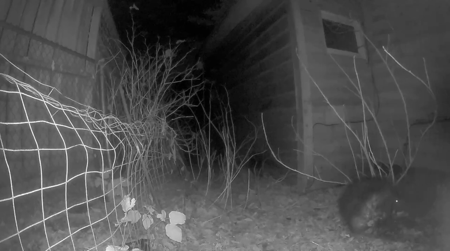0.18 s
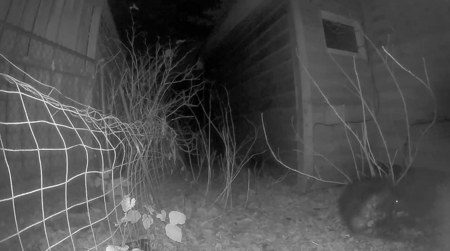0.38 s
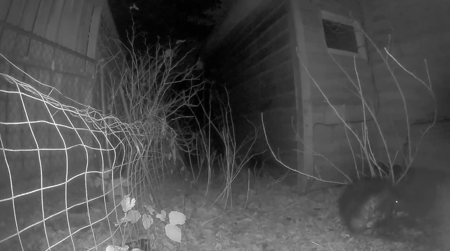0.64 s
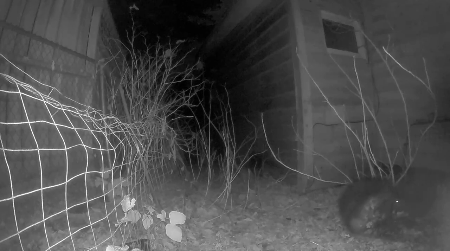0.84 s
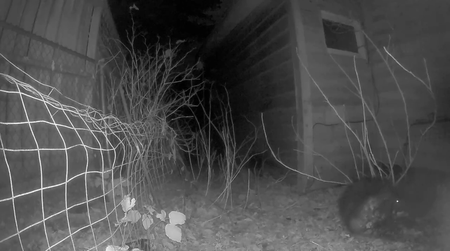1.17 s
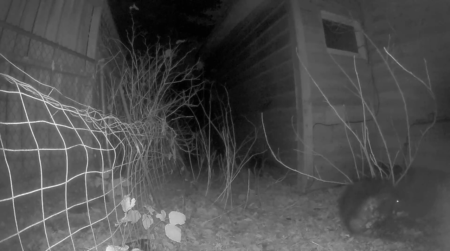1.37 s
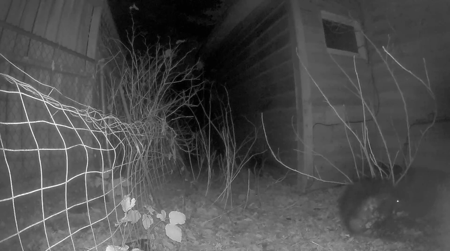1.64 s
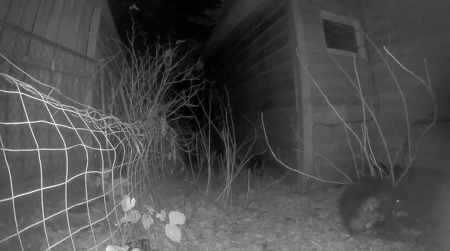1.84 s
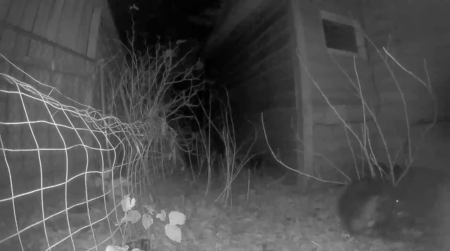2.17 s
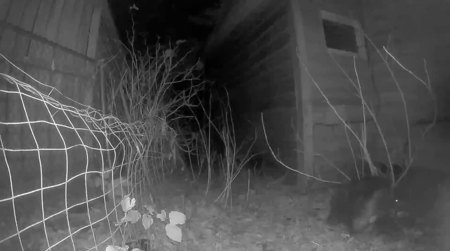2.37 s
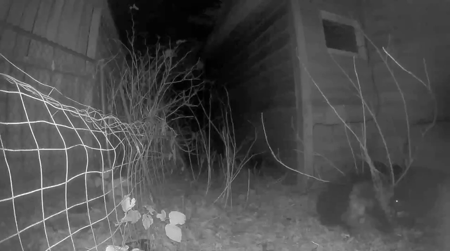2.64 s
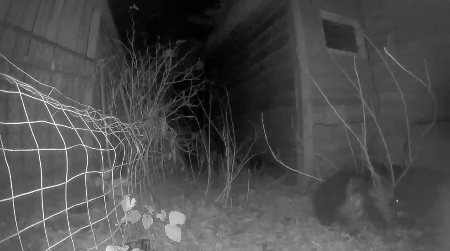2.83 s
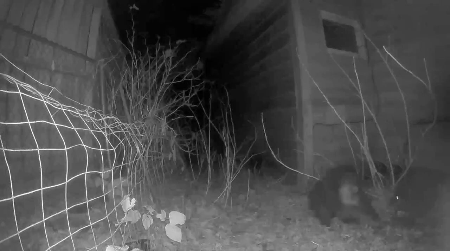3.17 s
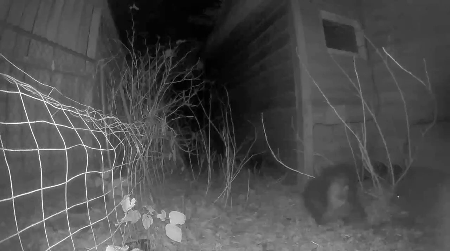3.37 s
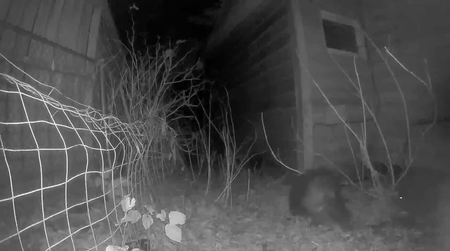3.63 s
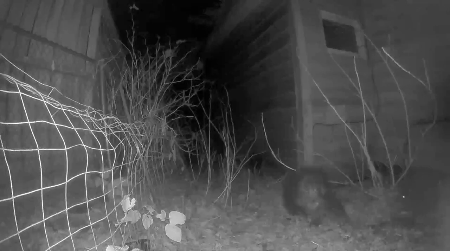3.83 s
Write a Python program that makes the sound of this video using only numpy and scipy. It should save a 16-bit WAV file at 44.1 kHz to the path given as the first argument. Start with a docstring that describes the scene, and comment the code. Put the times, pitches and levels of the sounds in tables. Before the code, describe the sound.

A porcupine whines and moans softly, then squeals loudly outdoors at night amid constant hiss

```python
"""Three nasal, quarrelling porcupine cries by a wooden shed at night, over the steady hiss of a small trail camera.
Each cry opens with a high squeak and slides down into a long moan; the third starts as a loud, rasping squeal.
Jittering vocal pulses and puffs of air ring a throat filter, in bands with their own level curves.
Wall echoes and a short noise tail follow; a filtered click makes a knock, narrow noise bursts make dry ticks."""
import sys
import numpy as np
from scipy import signal
from scipy.fft import rfft, irfft, next_fast_len
from scipy.io import wavfile
from scipy.ndimage import uniform_filter1d

SR = 44100
rng = np.random.default_rng(int(sys.argv[2]) if len(sys.argv) > 2 else 0)


def wav_out(sig):
    """Save sig, one row per channel (or a flat mono array), as 16-bit PCM at SR to the path in sys.argv[1]."""
    wavfile.write(sys.argv[1], SR, np.round(np.clip(np.atleast_2d(sig).T, -1, 1) * 32767).astype(np.int16))


N = 176400
TIME_S = np.arange(N) / SR

# Hiss spectrum. Each row: frequency [Hz], relative density [dB per Hz].
HISS_SPECTRUM = [(15, -42), (25, -12), (166, -8.5), (212, -12.5), (264, -6), (421, -9), (454, -9.5),
                 (760, -8.5), (1340, -10.5), (2030, -6.5), (2290, -8.5), (2470, -9.5), (4240, -11.5),
                 (7460, -16.5), (8860, -36.5), (11500, -65), (19500, -120)]
HISS_DB, CUTOFF_HZ = -65, 8900  # rms before the camera's filter; upper limit of voice, hiss and camera

# Dry ticks. Each row: start [s], burst level before halving [dB], pitch [Hz], t60 [s].
TICKS = [(1.203, -53, 7400, 0.016), (2.474, -53, 6200, 0.026), (3.709, -49, 5630, 0.0019)]
KNOCK_S, KNOCK_IMPULSE_DB, KNOCK_DULL_HZ = 3.229, -9.5, 5000

# Echoes off the walls. Each row: delay [s], gain [dB].
ECHOES = [(.0125, -19), (.021, -18), (.034, -22)]
YARD_DB, YARD_T60_S, YARD_DULL_HZ = -13, 0.58, 6000  # tail energy before dulling
SCATTER_DB, SCATTER_T60_S = -6.5, 0.028  # litter and boards right next to the animals

# Throat resonances, mouth nearly shut and wide open. Each row: frequency [Hz], gain [dB].
SHUT_THROAT = [(300, 8), (450, 1), (680, -2), (850, -6), (1050, 0), (1300, 2), (1550, -18.5), (1850, -10),
               (2150, -7), (2500, -17), (3050, -7), (3600, -19.5), (4300, -10), (4800, -14), (5600, 6.5),
               (6300, -33.5), (7300, -34), (9000, -48.5)]
OPEN_THROAT = [(400, -9.5), (700, -11.5), (1050, 1), (1370, 7.5), (1850, -12.5), (2200, -9), (2500, -5.5),
               (3050, 1.5), (3600, -4), (4100, -6.5), (4650, -1), (5100, -10), (5500, -19.5), (6200, -19.5),
               (7150, -3), (8000, -23.5), (9000, -44)]
# Turbulence at the teeth. Each row: frequency [Hz], gain [dB].
AIR_SPECTRUM = [(800, -20), (1300, -10), (1900, -8.5), (3000, -2), (4400, -2.5), (5700, -9.5),
                (6400, -11.5), (7500, -15.5), (9000, -38)]

# Base pitch of each cry. Each row: time [s], frequency [Hz].
WHINE_PITCH = [(.03, 421.4), (.06, 539), (.078, 419.2), (.094, 287.6), (.12, 227.2), (.182, 245.4),
               (.218, 244.4), (.276, 229.9), (.45, 222.4), (.666, 218.9), (.764, 179.8), (.836, 165.3),
               (.896, 176), (.99, 161.3)]
MOAN_PITCH = [(1.745, 720.5), (1.771, 697.7), (1.787, 558.5), (1.801, 357.7), (1.821, 247.6),
              (1.841, 213.2), (1.913, 263), (2.017, 259.1), (2.069, 251.7), (2.185, 256.3), (2.299, 233.1),
              (2.473, 218.7), (2.501, 201), (2.53, 178.4)]
SQUEAL_PITCH = [(3.112, 670), (3.126, 763.3), (3.14, 791.3), (3.16, 772.7), (3.188, 698.7), (3.202, 662.4),
                (3.258, 420), (3.29, 345.7), (3.346, 336.7), (3.38, 291.1), (3.43, 290.6), (3.456, 275.6),
                (3.542, 214.7), (3.634, 216.3), (3.698, 226.7), (3.75, 215.4), (3.79, 175.6)]
# Rasp of each cry. Each row: time [s], roughness [0-1].
WHINE_RASP = [(.06, 0.2), (.085, 0.83), (.16, 0.11), (.6, .1), (.9, 0.33)]
MOAN_RASP = [(1.77, 0.094), (1.796, 0.28), (1.85, 0.2), (1.92, 0.048), (2.501, 0.16)]
SQUEAL_RASP = [(3.145, .02), (3.17, .14), (3.195, .19), (3.235, .33), (3.275, .26), (3.31, .09),
               (3.47, .07), (3.58, .45)]
# Mouth of each cry. Each row: time [s], opening [0-1].
WHINE_MOUTH = [(.07, 0.1), (.2, 0.13), (.35, 0)]
MOAN_MOUTH = [(1.79, 0.29), (1.86, 0.075), (2.04, 0.23), (2.3, 0.089)]
SQUEAL_MOUTH = [(3.34, 0.58), (3.42, 0.55), (3.56, 0.54)]
# Fundamental of each cry. Each row: time [s], level before trim [dB].
WHINE_HUM = [(.03, -77), (.065, -57), (.102, -61.5), (.136, -74), (.19, -59.5), (.286, -66.5), (.36, -60.5),
             (.53, -83), (.752, -59.5), (.828, -64.5), (.94, -67.5), (.99, -73)]
MOAN_HUM = [(1.745, -63), (1.825, -60.5), (1.853, -86), (1.885, -58.5), (1.913, -52), (2.013, -52),
            (2.061, -56.5), (2.249, -56.5), (2.407, -65), (2.447, -76), (2.507, -63), (2.53, -64.5)]
SQUEAL_HUM = [(3.112, -60), (3.126, -54), (3.152, -58.5), (3.176, -43), (3.248, -56), (3.258, -48),
              (3.364, -54), (3.382, -46.5), (3.47, -45.5), (3.52, -60), (3.532, -65), (3.566, -58),
              (3.7, -66), (3.766, -55.5), (3.79, -86)]
# Low overtones against the nasal middle, one curve a cry. Each row: time [s], gain [dB].
LOW_GAINS = [
    [(.1, 1.5), (.22, -1), (.45, 5), (.66, 5), (.73, 6.5)],
    [(1.8, -2.5), (1.95, 3), (2.45, -0.5)],
    [(3.25, 4), (3.42, 1.5), (3.5, -10), (3.6, -2), (3.75, 8)],
]
# Nasal middle, treble and airy top, one curve a cry. Each row: time [s], level before trim [dB].
MIDDLE_LEVELS = [
    [(0.03, -80), (0.064, -57.5), (0.146, -64.5), (0.17, -56), (0.242, -54), (0.272, -59), (0.366, -63),
     (0.448, -60.5), (0.674, -67), (0.682, -71.5), (0.8, -84), (0.804, -87), (0.946, -80), (0.98, -93),
     (0.99, -81)],
    [(1.745, -76), (1.771, -61), (1.785, -47.5), (1.841, -57.5), (1.893, -54), (1.953, -60), (1.979, -57),
     (2.049, -67.5), (2.089, -58), (2.193, -67.5), (2.239, -61.5), (2.345, -64), (2.359, -62), (2.507, -67),
     (2.53, -84)],
    [(3.112, -69.5), (3.12, -44.5), (3.144, -47.5), (3.194, -31), (3.218, -34), (3.246, -37.5),
     (3.268, -38), (3.316, -46), (3.332, -38.5), (3.364, -53), (3.432, -50.5), (3.502, -42.5), (3.532, -55),
     (3.752, -64.5), (3.79, -91)],
]
TREBLE_LEVELS = [
    [(0.03, -73), (0.042, -92.5), (0.07, -59), (0.136, -76), (0.186, -61), (0.31, -65.5), (0.502, -64.5),
     (0.754, -70.5), (0.772, -82), (0.824, -68), (0.956, -90), (0.962, -76), (0.99, -86)],
    [(1.745, -61), (1.749, -61.5), (1.789, -45.5), (1.829, -64.5), (1.867, -67.5), (1.891, -56.5),
     (1.923, -59.5), (2.051, -55.5), (2.069, -60), (2.313, -68), (2.329, -62.5), (2.523, -67.5),
     (2.53, -78)],
    [(3.112, -65), (3.122, -38), (3.138, -29.5), (3.17, -22.5), (3.304, -35), (3.342, -36), (3.36, -47),
     (3.452, -46), (3.502, -66.5), (3.636, -57.5), (3.79, -65.5)],
]
TOP_LEVELS = [
    [(0.03, -96), (0.102, -67.5), (0.59, -67.5), (0.606, -77), (0.768, -67.5), (0.932, -92), (0.946, -78),
     (0.964, -88), (0.99, -83)],
    [(1.745, -75), (1.781, -63.5), (1.853, -74.5), (1.959, -63.5), (2.459, -74), (2.475, -65), (2.485, -86),
     (2.515, -74), (2.53, -94)],
    [(3.112, -75), (3.128, -48.5), (3.154, -39), (3.174, -37.5), (3.326, -57.5), (3.456, -58), (3.482, -61),
     (3.634, -59), (3.79, -67.5)],
]
# Nasal and bright resonances, moved by tongue and jaw, one curve a cry. Each row: time [s], centre [Hz].
NASAL_CENTRES = [
    [(.06, 1040), (.22, 1130), (.32, 930), (.42, 1390), (.55, 1230), (.66, 1090)],
    [(1.8, 1160), (1.98, 1010), (2.12, 1320), (2.26, 970), (2.4, 1198)],
    [(3.2, 1240), (3.33, 1426), (3.41, 1260), (3.47, 1360), (3.52, 1206), (3.57, 1600), (3.72, 1302)],
]
BRIGHT_CENTRES = [
    [(.08, 3040), (.22, 2770), (.45, 3500), (.55, 4186)],
    [(1.79, 2950), (1.97, 3520), (2.04, 3100), (2.3, 3200)],
    [(3.14, 5140), (3.18, 3720), (3.25, 3300), (3.29, 4170), (3.34, 4100), (3.38, 3930), (3.41, 2930),
     (3.46, 3170)],
]
# Trims in dB, one row a cry. Each row: fundamental, middle, treble, top.
TRIMS_DB = [(-0.81, -0.78, -0.63, -1.9), (-0.22, -1.4, -0.35, -0.44), (-1.4, -0.51, -0.7, 0.59)]

LOW_EDGE_HZ, MIDDLE_EDGE_HZ, TREBLE_EDGE_HZ = 850, 1850, 5000  # upper edges of the bands
ATTACK_S, RELEASE_S = .006, .015
JITTER_RATIO, JITTER_HZ, SHIMMER_DB = 0.0333, 166, 9  # spread at full roughness; jitter as a share of pitch
WAVER_RATIO, WAVER_HZ = 0.00369, 20.9  # share of pitch, whatever the roughness
OPEN_AIR, SHUT_AIR = .5, 2.2  # gain of the turbulence, mouth open and shut
MIDDLE_AIR, TOP_AIR = .3, 7.5  # gain in the middle; top gain relative to the treble
NASAL_DB, NASAL_WIDTH_HZ, BRIGHT_DB, BRIGHT_WIDTH_HZ = 7, 180, 3.5, 180  # half-widths at half the lift
PULSE_SPREAD_RAD = .12  # soft closure of the folds: lag per squared order


def from_db(db):
    """Decibels to gain."""
    return 10 ** (np.asarray(db) / 20)


def rms_one(x):
    """Scale to unit power."""
    return x / np.sqrt(np.mean(x ** 2) + 1e-20)


def strength(x, size=600):
    """Short-term rms, window in samples, smoothed twice."""
    power = uniform_filter1d(uniform_filter1d(x * x, size), size)
    return np.sqrt(np.abs(power) + 1e-12)


def even(x):
    """Hold the short-term power near one."""
    return x / strength(x)


def in_time(rows, t):
    """Linear curve through the rows, at the times t."""
    s, value = np.transpose(rows)
    return np.interp(t, np.sort(s), value)


def butter(x, hz, kind, order=2):
    """Butterworth filter."""
    return signal.sosfilt(signal.butter(order, hz, kind, fs=SR, output="sos"), x)


def drift(hz, size):
    """Low-passed noise: random wandering up to a given rate, rms 1."""
    return rms_one(butter(rng.standard_normal(size + SR // 2), hz, "low")[-size:])


def colour(x, points):
    """Causal minimum-phase filter with the given spectrum, by folding the cepstrum."""
    size = 2 * next_fast_len(len(x) // 2 + SR // 10)
    hz, db = np.transpose(points)
    bins_hz = np.maximum(np.arange(size // 2 + 1) * SR / size, 1)
    gain_db = np.interp(np.log(bins_hz), np.log(hz), db)
    cepstrum = irfft(np.log(from_db(gain_db)))
    cepstrum[1:size // 2] *= 2
    cepstrum[size // 2 + 1:] = 0
    response = np.exp(rfft(cepstrum))
    return irfft(rfft(x, size) * response)[:len(x)]


def camera_hiss():
    """Steady coloured noise, low-passed."""
    noise = colour(rng.standard_normal(N), HISS_SPECTRUM)
    return from_db(HISS_DB) * rms_one(butter(noise, CUTOFF_HZ, "low", order=8))


def yard(x):
    """Discrete wall echoes and a short diffuse tail of decaying noise."""
    t = TIME_S[:SR]
    build_up = np.clip(t / ECHOES[0][0], 0, 1)
    tail = rng.standard_normal(SR) * from_db(-60 * t / YARD_T60_S) * build_up
    tail = butter(tail, YARD_DULL_HZ, "low") / np.sqrt(np.sum(tail ** 2))
    echoes = sum(from_db(db) * np.interp(TIME_S - delay_s, TIME_S, x) for delay_s, db in ECHOES)
    return echoes + from_db(YARD_DB) * signal.fftconvolve(x, tail)[:N]


def scatter(x):
    """Nearby surfaces blur the treble of each pulse over a few milliseconds."""
    t = TIME_S[:SR // 10]
    blur = rng.standard_normal(len(t)) * from_db(-60 * t / SCATTER_T60_S)
    blur = blur / np.sqrt(np.sum(blur ** 2))
    treble = butter(x, MIDDLE_EDGE_HZ, "high")
    return x + from_db(SCATTER_DB) * signal.fftconvolve(treble, blur)[:N]


def ticks(width=0.015):
    """Narrow bright noise bursts that start at once and decay exponentially."""
    out = np.zeros(N)
    for start_s, db, hz, t60_s in TICKS:
        band_hz = [hz * (1 - width), hz * (1 + width)]
        burst = rms_one(butter(rng.standard_normal(N), band_hz, "band", order=1))
        decay_db = -60 * np.clip((TIME_S - start_s) / t60_s, 0, 2)
        out += .5 * burst * (TIME_S >= start_s) * from_db(db + decay_db)
    return out


def knock():
    """A sharp knock at the height of the squeal: one impulse through a gentle low-pass."""
    click = np.zeros(N) + 1e-18
    click[int(KNOCK_S * SR)] = from_db(KNOCK_IMPULSE_DB)
    return butter(click, KNOCK_DULL_HZ, "low", order=1)


def resonance_db(hz, centre_hz, peak_db, width_hz):
    """Bell-shaped lift around a resonance."""
    return peak_db / (1 + ((hz - centre_hz) / width_hz) ** 2)


def vocal_pulses(hz, phase, nasal_hz, bright_hz):
    """Overtones of the vocal folds, lifted where they meet the two moving resonances."""
    out = 0
    for k in range(2, int(CUTOFF_HZ / hz.min())):
        lift_db = resonance_db(k * hz, nasal_hz, NASAL_DB, NASAL_WIDTH_HZ)
        lift_db = lift_db + resonance_db(k * hz, bright_hz, BRIGHT_DB, BRIGHT_WIDTH_HZ)
        below_cutoff = np.clip(CUTOFF_HZ / hz - k + 1, 0, 1)
        out = out + np.cos(k * phase - PULSE_SPREAD_RAD * k * k) * from_db(lift_db) * below_cutoff
    return even(out)


def cry(pitch, hum, low_gain, middle_level, treble_level, top_level, nasal, bright, rasp, opening, trim_db):
    """Jittering vocal pulses and puffs of air ring the throat above a clean fundamental."""
    start_s, end_s = pitch[0][0], pitch[-1][0]
    span = (TIME_S > start_s - ATTACK_S) & (TIME_S < end_s + RELEASE_S)
    t = TIME_S[span]
    size = len(t)
    rough = in_time(rasp, t)
    mouth = np.clip(in_time(opening, t), 0, 1)

    jitter = JITTER_RATIO * rough * drift(JITTER_HZ, size)
    waver = WAVER_RATIO * drift(WAVER_HZ, size)
    hz = in_time(pitch, t) * (1 + jitter + waver)
    phase = 2 * np.pi * np.cumsum(hz) / SR
    pulses = vocal_pulses(hz, phase, in_time(nasal, t), in_time(bright, t))
    pulses = pulses * from_db(SHIMMER_DB * rough * drift(JITTER_HZ, size))
    voiced = mouth * colour(pulses, OPEN_THROAT) + (1 - mouth) * colour(pulses, SHUT_THROAT)

    # one puff of air per pitch cycle
    noise = butter(rng.standard_normal(size), CUTOFF_HZ, "low")
    air = rough * rms_one(noise * (1 + np.cos(phase)) ** 2)
    rushing = colour(air, AIR_SPECTRUM)
    airiness = mouth * OPEN_AIR + (1 - mouth) * SHUT_AIR

    fundamental = np.sqrt(2) * np.cos(phase)
    low = butter(voiced, LOW_EDGE_HZ, "low", order=6) * from_db(in_time(low_gain, t))
    middle = butter(voiced + MIDDLE_AIR * rushing, [LOW_EDGE_HZ, MIDDLE_EDGE_HZ], "band", order=5)
    treble = butter(voiced + airiness * rushing, [MIDDLE_EDGE_HZ, TREBLE_EDGE_HZ], "band", order=8)
    top = butter(voiced + TOP_AIR * airiness * rushing, TREBLE_EDGE_HZ, "high", order=14)

    # the middle's strength sets the gain of the low overtones too
    parts = fundamental, (low + middle) / strength(middle), even(treble), even(top)
    levels = hum, middle_level, treble_level, top_level
    voice = sum(part * from_db(in_time(level, t) + trim)
                for part, level, trim in zip(parts, levels, trim_db))
    fade_in = np.clip((t - t[0]) / ATTACK_S, 0, 1)
    fade_out = np.clip((t[-1] - t) / RELEASE_S, 0, 1)
    out = np.zeros(N)
    out[span] = fade_in * fade_out * voice
    return out


def porcupines():
    """A whine and a moan with the mouth nearly shut, then the squeal with a wider mouth."""
    pitches = WHINE_PITCH, MOAN_PITCH, SQUEAL_PITCH
    hums = WHINE_HUM, MOAN_HUM, SQUEAL_HUM
    rasps = WHINE_RASP, MOAN_RASP, SQUEAL_RASP
    mouths = WHINE_MOUTH, MOAN_MOUTH, SQUEAL_MOUTH
    return sum(map(cry, pitches, hums, LOW_GAINS, MIDDLE_LEVELS, TREBLE_LEVELS, TOP_LEVELS,
                   NASAL_CENTRES, BRIGHT_CENTRES, rasps, mouths, TRIMS_DB))


def scene():
    """The cries in the yard, with knock and ticks, over the hiss."""
    voices = scatter(porcupines())
    return (camera_hiss() + yard(voices) + ticks() + knock() + voices)[None]


def record(dry):
    """The camera cuts the top steeply: an elliptic low-pass."""
    return signal.sosfilt(signal.ellip(10, .2, 80, CUTOFF_HZ, fs=SR, output="sos"), dry)


dry = scene()
out = record(dry)
wav_out(out)
```